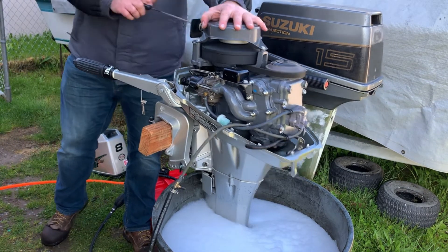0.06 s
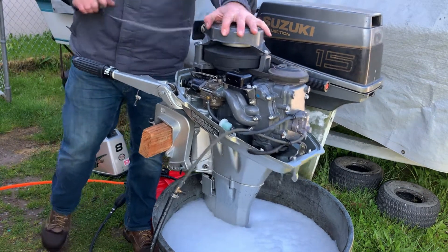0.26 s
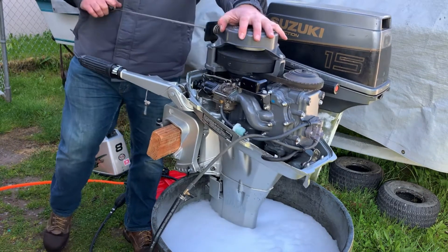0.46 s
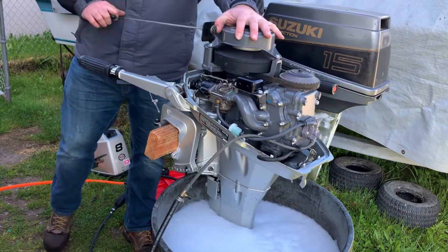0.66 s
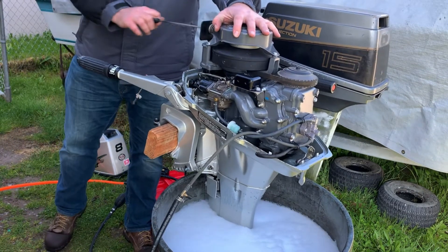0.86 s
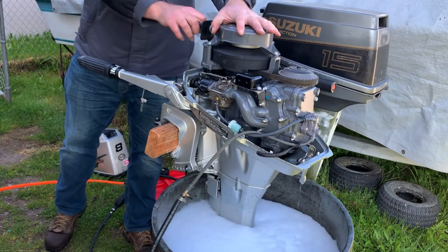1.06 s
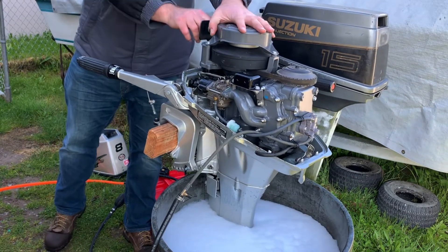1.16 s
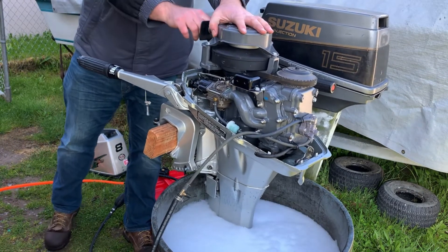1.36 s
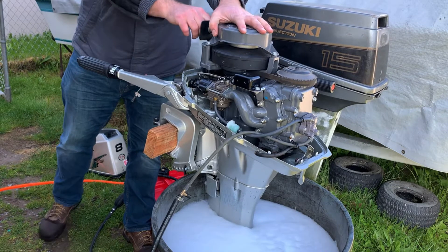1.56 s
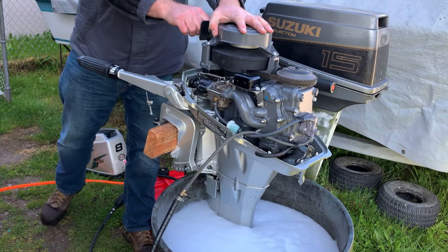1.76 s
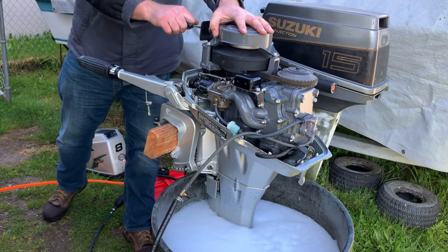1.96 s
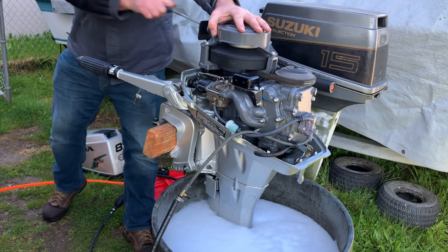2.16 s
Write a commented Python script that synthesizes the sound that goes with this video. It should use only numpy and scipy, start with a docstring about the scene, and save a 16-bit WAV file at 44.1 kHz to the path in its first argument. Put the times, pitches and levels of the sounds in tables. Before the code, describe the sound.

Hand-pulled starter rope on a small outboard: metallic clacks, short squeak, rewind hiss, no engine start

```python
"""Outdoors, at a small uncovered outboard motor: its recoil starter is worked by hand, the engine does not
fire. Rope and sliding pawls are shaped noise; clacks are grainy noise bursts in three bands; a spring squeaks
in thin wavering tones; pawls, cover, ratchet and housing ring as damped modes, bumps as single damped notes.
The rope hisses back onto its reel; after a pause the pawls catch again and the rope groans in rising tones.
Below lies a low rumble of coloured noise with a distant two-tone drone."""
import sys
import numpy as np
from scipy import signal
from scipy.fft import rfft, irfft
from scipy.io import wavfile

SR = 44100
rng = np.random.default_rng(int(sys.argv[2]) if len(sys.argv) > 2 else 0)


def digitize_waveform(pressure):
    """Quantize a signal to 16-bit integers and store it at the path in sys.argv[1].

    Rows of a 2-D input are taken as channels; values are limited to [-1, 1].
    """
    field = np.atleast_2d(pressure).T
    bounded = np.clip(field, -1, 1)
    quanta = np.round(bounded * 32767).astype(np.int16)
    wavfile.write(sys.argv[1], SR, quanta)


N = 97020
T = np.arange(N) / SR


def from_db(db):
    """Decibels to gain."""
    return 10 ** (np.asarray(db) / 20)


def rms_one(x):
    """Scale to rms 1."""
    return x / np.sqrt(np.mean(x ** 2) + 1e-20)


def level(rows):
    """Gain over time from (t/s, level/dB) points; end levels hold."""
    return from_db(np.interp(T, *np.transpose(rows)))


def at_hz(points, hz):
    """Interpolate a table on a log-frequency axis."""
    f, v = np.transpose(points)
    return np.interp(np.log(hz + 1), np.log(f), v)


def drift(hz):
    """Smooth random signal of rms 1: noise through a two-pole lowpass."""
    r = np.exp(-2 * np.pi * hz / SR)
    smooth = signal.lfilter([1], [1, -2 * r, r * r], rng.standard_normal(2 * N))
    return rms_one(smooth[N:])  # filter settled


def noise(spectrum, likeness):
    """Stereo noise of rms 1 with a given spectrum and left-right likeness."""
    hz = np.arange(N // 2 + 1) * SR / N
    mid, side = rfft(rng.standard_normal((2, N)))
    alike = np.clip(at_hz(likeness, hz), -1, 1)
    low_edge = np.minimum(hz / spectrum[0][0], 1) ** 2
    colour = low_edge * from_db(at_hz(spectrum, hz))
    stereo = np.sqrt(1 + alike) * mid + np.sqrt(1 - alike) * side * [[1], [-1]]
    return rms_one(irfft(colour * stereo, N))


def tone(hz, waver, rate_hz):
    """Sine of rms 1 whose pitch wanders by the fraction waver (rms)."""
    wandering_hz = hz * (1 + waver * drift(rate_hz))
    return np.sqrt(2) * np.sin(2 * np.pi * np.cumsum(wandering_hz) / SR)


# contact noise, left-right: f/Hz, likeness (0-1)
LIKENESS = [(1200, 0.85), (5000, 0)]


def rubbing(levels, colour, rough_db, rate_hz):
    """Sliding contact: a hiss that catches and slips."""
    roughness = rms_one(from_db(rough_db * drift(rate_hz)))
    return level(levels) * noise(colour, LIKENESS) * roughness


RING_RISE_S, PHASE_SPREAD_HZ = 0.0005, 9000


def struck(modes, blows, t60_s, rise_s=RING_RISE_S):
    """Each blow shares its energy afresh among damped modes; high modes reach the sides out of step."""
    hz, db = np.transpose(modes)
    t = T[:SR // 4]
    out = np.zeros((2, N + SR))
    envelope = from_db(-60 * t / t60_s) * (1 - np.exp(-t / rise_s))
    rings = envelope * np.exp(2j * np.pi * hz[:, None] * t)
    for s, blow_db in blows:
        size, phase, apart = rng.standard_normal((3, len(modes)))
        share = from_db(db + 2 * size)
        share = share / np.sqrt(np.sum(share ** 2) / 2)
        turn = np.pi * phase + apart * hz / PHASE_SPREAD_HZ * [[0.5], [-0.5]]
        start = int(max(s, 0) * SR)
        blow = ((share * np.exp(1j * turn)) @ rings).imag
        out[:, start:start + len(t)] += from_db(blow_db) * blow
    return out[:, :N]


# outdoor air spectrum: f/Hz, relative level/dB
AIR = [(25, -33.5), (47, -15), (72, -9), (135, -13), (326, -25.5), (590, -32.5), (1000, -33.5),
       (2700, -47.5), (5000, -68), (16000, -69.5)]
# outdoor air, left-right: f/Hz, likeness (0-1)
AIR_LIKENESS = [(120, .86), (1000, .2)]
# low drone tone: t/s, f/Hz, level/dB
DRONE = [(.4, 84, -55), (1.18, 70.24, -58), (1.3, 74.64, -49), (1.46, 67, -43), (1.62, 69.73, -57.5),
         (1.78, 71.47, -50), (2.15, 73.46, -51)]
AIR_DB = -51
DRONE_UPPER_HZ, DRONE_UPPER_DB, DRONE_WAVER = 126, -60, 0.016


def background():
    """Outdoor rumble, plus a distant drone whose low tone swells and sags."""
    s, hz, db = np.transpose(DRONE)
    low = from_db(np.interp(T, s, db)) * tone(np.interp(T, s, hz), DRONE_WAVER, rate_hz=6)
    upper = from_db(DRONE_UPPER_DB) * tone(DRONE_UPPER_HZ, DRONE_WAVER, rate_hz=6)
    return from_db(AIR_DB) * noise(AIR, AIR_LIKENESS) + low + upper


CLACK_RISE_S, CLACK_T60_S = 0.0006, 0.041
ECHO_DB, ECHO_T60_S = -16, 0.14


def clack_shape(s, chatter_s):
    """Sharp rise, a moment of chatter, quick decay and a faint longer tail of yard echoes."""
    age = np.maximum(T - s, 0)
    after = np.maximum(age - chatter_s, 0)
    direct = from_db(-60 * after / CLACK_T60_S)
    echoes = from_db(ECHO_DB - 60 * after / ECHO_T60_S)
    return (1 - np.exp(-age / CLACK_RISE_S)) * np.hypot(direct, echoes)


# starter clacks: t/s, chatter/s, low-mid level/dB, presence level/dB, treble level/dB
CLACKS = [(0.013, 0.011, -48, -53, -56), (0.2315, 0.0047, -34, -25.5, -16.5),
          (0.272, 0.001, -31, -26.5, -22.5), (0.3437, .002, -63, -46, -29),
          (0.354, 0.013, -51.5, -40, -40.5), (0.3748, 0.01, -29, -21, -19.5),
          (0.6347, 0.0017, -52.5, -43.5, -41), (0.6526, 0.002, -40, -31, -23.5),
          (0.671, 0.0022, -49, -55, -52), (1.085, .004, -49, -62, -72), (1.1, 0.002, -50.5, -53, -72.5),
          (1.7941, 0.0015, -47.5, -42.5, -38.5), (1.825, 0.0086, -60, -55, -41),
          (1.8605, 0.004, -41, -36.5, -34.5), (1.8981, 0.002, -39, -37, -22),
          (1.903, 0.0043, -31, -40, -48), (1.915, 0.0067, -49, -39, -60), (1.93, 0.009, -50, -47, -54)]
# spectra of the three ranges: f/Hz, relative level/dB
LOW_MID = [(150, -22), (280, -4), (400, -14), (640, 0), (800, -1), (1000, 0.5), (1350, -5), (1700, -0.5),
           (2300, -8.5), (4000, -43.5)]
PRESENCE = [(900, -35.5), (1700, -12.5), (2400, 0), (3400, -5.5), (4300, -3.5), (5300, -1), (6800, -18),
            (9500, -27.5)]
TREBLE = [(4500, -29), (6800, -6), (7900, -5.5), (9200, 6.5), (10600, -6), (12500, -9.5), (14300, 0.5),
          (16000, -21)]
GRAIN_DB, GRAIN_HZ = 3.0, 1480  # unevenness of the chatter


def clacks():
    """Metal parts meet in a broad, grainy crack."""
    rows = np.array(CLACKS)
    shapes = np.array([clack_shape(s, chatter_s) for s, chatter_s in rows[:, :2]])
    cracks = np.zeros((2, N))
    for db, colour in zip(rows[:, 2:].T, (LOW_MID, PRESENCE, TREBLE)):
        envelope = np.sqrt(from_db(db) ** 2 @ shapes ** 2)  # powers add
        cracks += envelope * noise(colour, LIKENESS)
    grain = rms_one(from_db(GRAIN_DB * drift(GRAIN_HZ)))
    return cracks * grain


# soft, dull bumps: t/s, f/Hz, level/dB
BUMPS = [(.062, 500, -40.5), (.612, 264, -40), (0.82, 84, -33), (0.926, 440, -44)]
BUMP_RISE_S, BUMP_T60_S = 0.0021, 0.034


def bumps():
    """Soft contacts, each one damped low note."""
    return sum(struck([(hz, 0)], [(s, db)], BUMP_T60_S, BUMP_RISE_S) for s, hz, db in BUMPS)


# rope drawn over its guide: t/s, level/dB
PULL_LEVEL = [(.085, -62.5), (.135, -46), (.2, -50.5), (.228, -44), (.335, -57), (.44, -54), (.56, -75.5),
              (2.0, -84), (2.1, -64), (2.16, -56)]
# its spectrum: f/Hz, relative level/dB
PULL = [(200, -16.5), (550, -5), (1400, -9), (4000, -14), (9000, -19), (15000, -38)]


def rope_pull():
    """Rope drawn out over its guide: rough friction noise."""
    return rubbing(PULL_LEVEL, PULL, rough_db=4.0, rate_hz=38)


# pawls sliding on the flywheel cup: t/s, level/dB
SLIDE_LEVEL = [(.085, -76), (.145, -45.5), (.18, -50.5), (.2, -66), (.29, -50), (.36, -73.5), (.6, -88.5)]


def pawl_slide():
    """Pawls slide on the flywheel cup: friction noise in the treble."""
    return rubbing(SLIDE_LEVEL, TREBLE, rough_db=2.5, rate_hz=300)


# steel pawl landings: t/s, level/dB
PAWL_HITS = [(.2322, -20), (0.3401, -22.5), (.3775, -20.5), (1.831, -38), (1.898, -26)]
# pawl modes: f/Hz, relative level/dB
PAWL = [(7106, -15.5), (8260, 0.5), (8586, 8), (8938, -0.5), (9095, -3.5), (9660, -6), (10200, -6.5),
        (12480, -4), (13322, -5), (13724, -5.5), (14220, -1.5)]


def pawl_ring():
    """A steel pawl lands and rings in high modes."""
    return struck(PAWL, PAWL_HITS, t60_s=0.082)


# jars to the starter cover: t/s, level/dB
COVER_HITS = [(.2325, -25), (0.272, -36.5), (.379, -33)]
# cover modes: f/Hz, relative level/dB
COVER = [(1290, -5), (1668, -2), (2190, -1.5), (3750, -5.5), (5185, -0.5)]


def cover_ring():
    """The starter cover is jarred into its modes."""
    return struck(COVER, COVER_HITS, t60_s=0.085)


# spring squeak: t/s, level/dB
SQUEAK_LEVEL = [(.25, -67.5), (.266, -42.5), (.328, -45), (.348, -58.5), (.38, -73.5)]
# its tones: f/Hz, relative level/dB
SQUEAK_TONES = [(4685, 3), (5683, -2), (13724, -21.5)]
SQUEAK_WAVER = 0.0012


def squeak():
    """A squeaking spring keeps a few thin steel tones singing."""
    sounding = (T > SQUEAK_LEVEL[0][0]) & (T < SQUEAK_LEVEL[-1][0])
    tones = sum(from_db(db) * tone(hz, SQUEAK_WAVER, rate_hz=60) for hz, db in SQUEAK_TONES)
    return sounding * level(SQUEAK_LEVEL) * tones


# mechanism against housing: t/s, level/dB
KNOCKS = [(0.3803, -18.5), (1.089, -50.5), (1.9025, -28)]
# housing modes: f/Hz, relative level/dB
HOUSING = [(208, -12), (290, -7), (545, -5.5), (615, -2), (685, 0), (958, -1), (1110, -4.5)]


def housing_knocks():
    """The mechanism knocks the housing into its low-mid modes."""
    return struck(HOUSING, KNOCKS, t60_s=0.071, rise_s=0.0014)


# rope winding back: t/s, level/dB
REWIND_LEVEL = [(.58, -65), (.93, -61.5), (1.07, -68), (1.15, -81), (1.75, -84.5), (1.82, -52), (1.95, -71),
                (2.04, -73.5), (2.2, -62)]
# its spectrum: f/Hz, relative level/dB
REWIND = [(500, -10), (2400, 0.5), (4200, -4.5), (9500, -8), (14000, -27.5), (16000, -32.5)]


def rope_rewind():
    """Rope winds back onto its reel: an even friction hiss."""
    return rubbing(REWIND_LEVEL, REWIND, rough_db=0.5, rate_hz=150)


# ratchet snapping free: t/s, level/dB
SNAPS = [(.6528, -32.5)]
# ratchet modes: f/Hz, relative level/dB
SNAP = [(668, -11.5), (1580, -4.5), (2400, -1.5), (2570, -1), (3530, -7)]


def ratchet_snap():
    """The ratchet snaps free as the rope turns back and rings briefly."""
    return struck(SNAP, SNAPS, t60_s=0.045)


# rope groan at the next pull: t/s, level/dB
GROAN_LEVEL = [(2.12, -75), (2.165, -55), (2.2, -54.5)]
# its tones at onset: f/Hz, relative level/dB
GROAN_TONES = [(530, 2), (900, -4.5), (1270, -1.5)]
GROAN_WAVER, GROAN_OCTAVES_PER_S = 0.028, 1.2


def groan():
    """The rope sticks and slips on its guide in rough tones that climb as it gathers speed."""
    age = T - GROAN_LEVEL[0][0]
    climb = 2 ** (GROAN_OCTAVES_PER_S * np.maximum(age, 0))
    tones = np.zeros(N)
    for hz, db in GROAN_TONES:
        flutter = rms_one(2 + drift(80))
        tones += from_db(db) * tone(hz * climb, GROAN_WAVER, rate_hz=86.5) * flutter
    return (age > 0) * level(GROAN_LEVEL) * tones


RIGHT_LAG_S, LAG_BELOW_HZ, PAN_DB = 0.000056, 10000, -0.62


def lagged(x):
    """A tiny delay that fades out in the high treble."""
    hz = np.arange(N // 2 + 1) * SR / N
    lag_s = RIGHT_LAG_S / (1 + (hz / LAG_BELOW_HZ) ** 6)
    return irfft(rfft(x) * np.exp(-2j * np.pi * hz * lag_s), N)


def scene():
    """The starter close by, a little earlier on the left, over the background; right side louder."""
    rope = rope_pull() + rope_rewind() + groan()
    ringing = pawl_ring() + cover_ring() + housing_knocks() + ratchet_snap()
    left, right = clacks() + bumps() + pawl_slide() + squeak() + rope + ringing
    starter = np.array([left, lagged(right)])
    return (starter + background()) * from_db([[PAN_DB], [-PAN_DB]])


NOTCH_HZ, NOTCH_Q = 11600, 14
STOP_HZ, STOP_DB = 16800, 70


def record(dry):
    """Microphone with a narrow dip in the high treble and a steep top cut."""
    coloured = signal.lfilter(*signal.iirnotch(NOTCH_HZ, NOTCH_Q, fs=SR), dry)
    top_cut = signal.cheby2(12, STOP_DB, STOP_HZ, fs=SR, output="sos")
    return signal.sosfilt(top_cut, coloured)


dry = scene()
out = record(dry)
digitize_waveform(out)
```